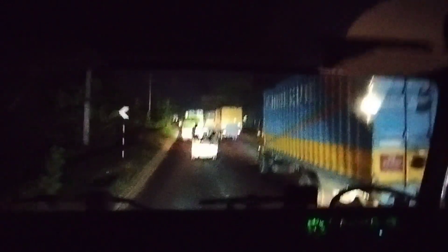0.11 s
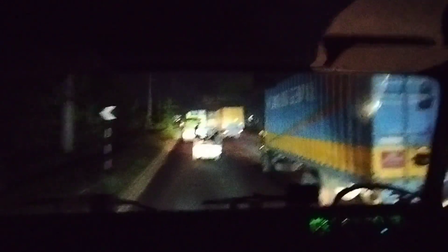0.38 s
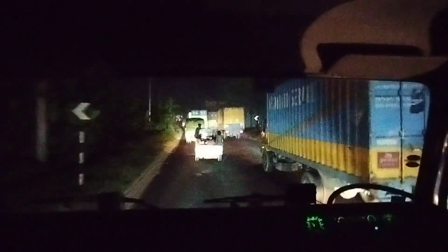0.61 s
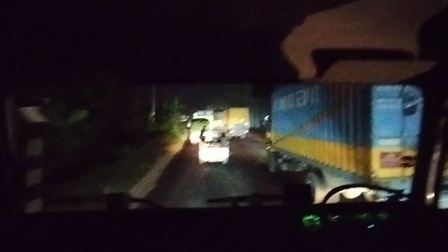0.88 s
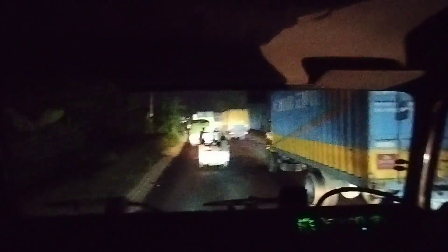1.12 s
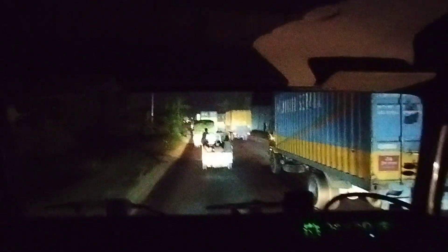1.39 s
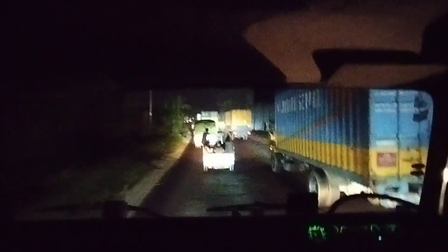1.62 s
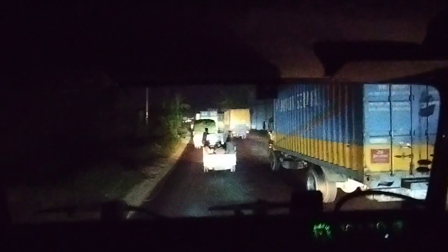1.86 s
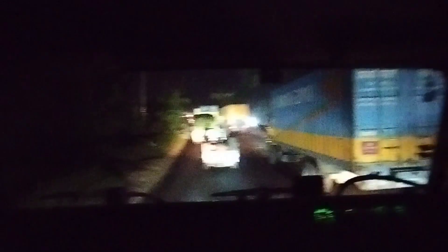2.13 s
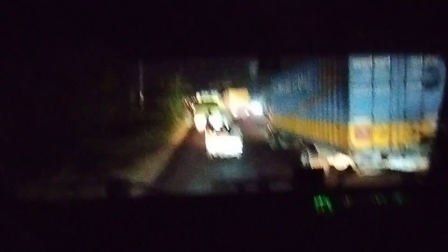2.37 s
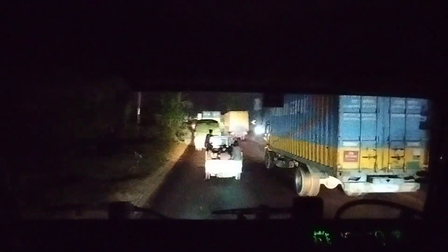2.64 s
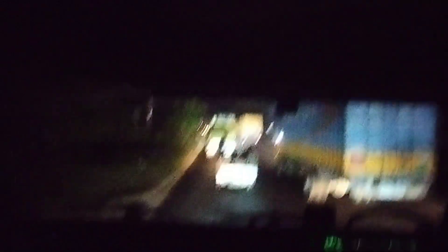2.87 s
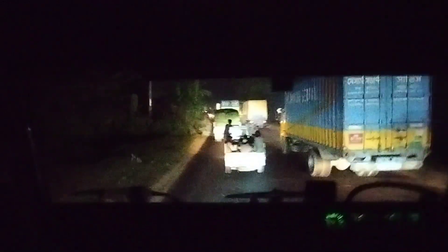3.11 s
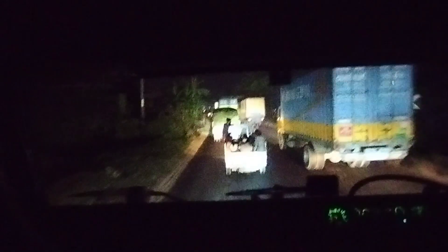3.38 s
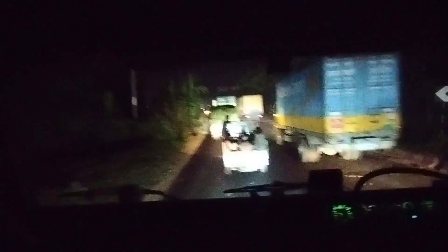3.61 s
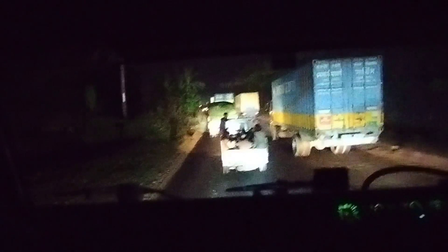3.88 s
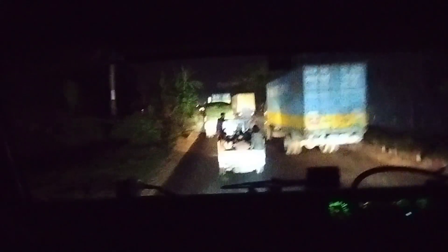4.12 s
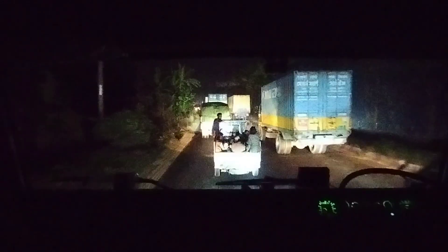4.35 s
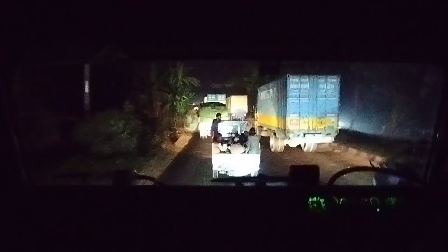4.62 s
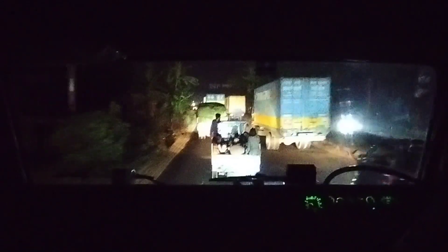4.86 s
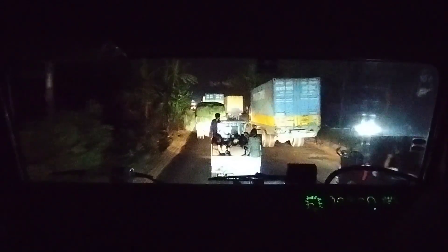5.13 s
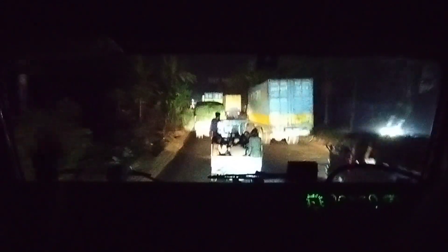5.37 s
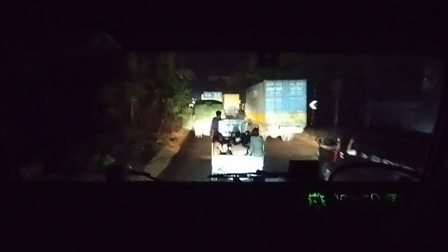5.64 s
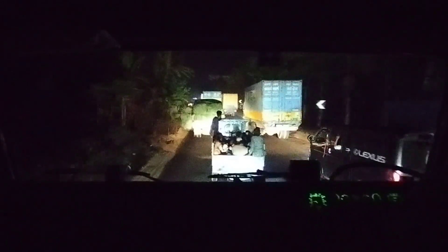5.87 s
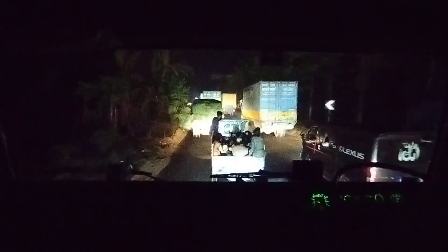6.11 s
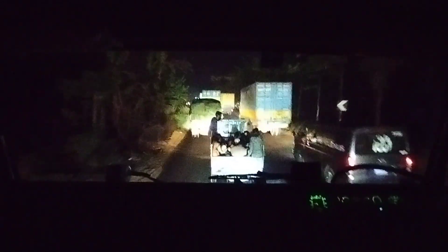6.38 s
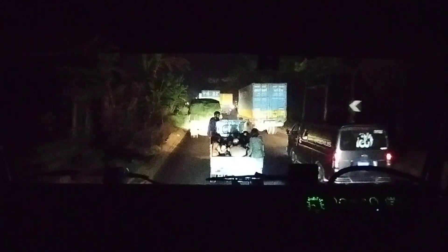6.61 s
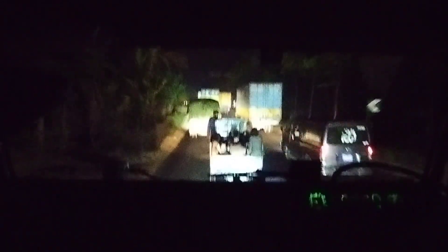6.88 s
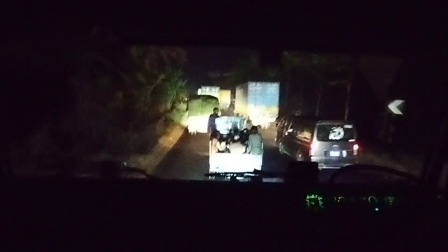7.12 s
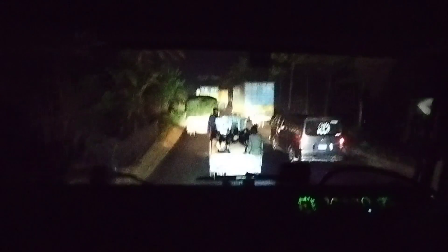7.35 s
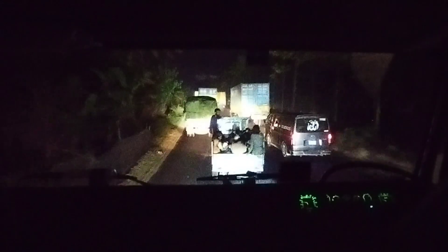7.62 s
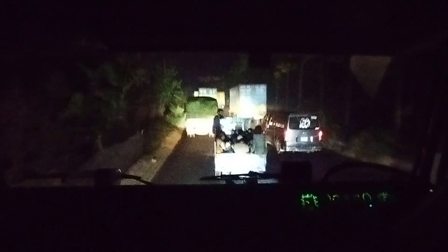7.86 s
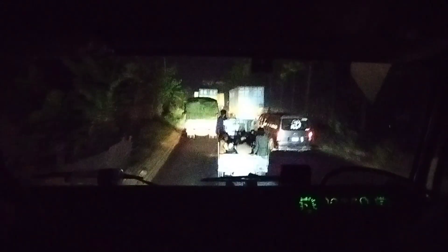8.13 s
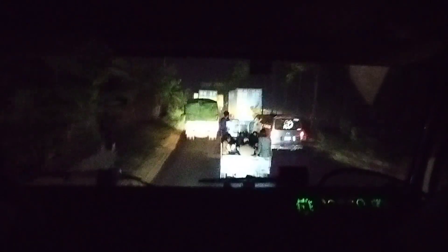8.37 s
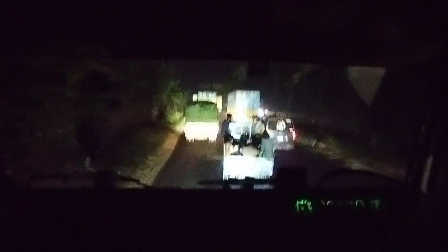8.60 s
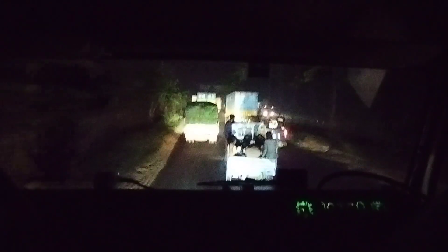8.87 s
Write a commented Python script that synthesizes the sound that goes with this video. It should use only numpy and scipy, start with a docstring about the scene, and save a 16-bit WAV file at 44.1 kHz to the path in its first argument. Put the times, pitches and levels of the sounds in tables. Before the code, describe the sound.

For nine seconds we sit inside a heavy diesel lorry on a rough road, with a close microphone slightly overwhelmed by bass. From 0 to 2 s a deep, irregular body-shake boom heaves over muffled tyre roar, humming panels and fine rattles; keys clink around 1.1 s and trim scratches at jolts. At 2.1-2.5 s the floor panel knocks, then tiny squeaks and metallic tinkles cluster until 3.5 s. The engine note sinks gradually from 2 s, becoming a clearer low throb from about 3.5 s. A tiny dry tick comes at 4.3 s. Engine pitch bottoms near 6 s; at 6.2 s a seat spring gives a short, bright singing squeak. Engine speed climbs back by 7.7 s, with steadier booming, engine clatter, soft rubs and faint fitting buzzes until the end. Heavy surges briefly duck everything.

```python
"""A deep boom fills the cab of a heavy diesel lorry on a rough road, over a roar through the floor.
The boom is the firing tone mixed with body-shake noise; the roar, its hums and clatter are filtered noise.
Loose keys and floor panels ring as struck modes; trim rubs as bursts of grains and squeaks by stick-slip.
A dry tick, a singing seat spring and a buzzing fitting follow; a gain control ducks under loud surges."""
import sys
import numpy as np
from scipy import signal
from scipy.fft import rfft, irfft, next_fast_len
from scipy.io import wavfile
from scipy.ndimage import uniform_filter1d, minimum_filter1d

SR = 44100
rng = np.random.default_rng(int(sys.argv[2]) if len(sys.argv) > 2 else 0)


def elevation(decibels):
    """Turn decibel levels (scalar or array-like) into linear amplitude ratios."""
    levels = np.asarray(decibels, float)
    return 10 ** (levels / 20)


def bounce(signal):
    """Save signal as a 16-bit WAV file at the path given by the first command-line argument."""
    frames = np.transpose(np.atleast_2d(signal))
    limited = np.clip(frames, -1, 1)
    pcm = np.round(limited * 32767).astype(np.int16)
    wavfile.write(sys.argv[1], SR, pcm)


N = 396459

# engine: t/s, firing f/Hz, level of twice the firing rate/dB (before a 2 dB cut)
ENGINE_CURVE = [(0, 49.3, -27), (.45, 48.77, -18.5), (1.2, 47.8, -19.5), (1.45, 46.42, -17),
                (1.65, 46.43, -19), (1.85, 45.23, -48), (2.8, 40.97, -40), (3.4, 39, -42),
                (3.8, 36.66, -41), (4.2, 31.94, -47), (4.85, 29.8, -19), (5.0, 27.4, -15.5),
                (5.2, 30.52, -9.5), (5.3, 27.65, -19), (5.5, 26.2, -17), (5.8, 23.45, -9.5),
                (6.1, 22.71, -12.5), (6.4, 24.06, -10), (6.62, 28.87, -17), (6.88, 32.35, -24),
                (7.1, 31.44, -33), (7.3, 34.1, -39), (7.36, 41.54, -27.5), (7.65, 43.57, -28),
                (7.8, 41.1, -31), (8.04, 42.05, -25), (8.2, 43.07, -30), (8.6, 44.05, -24.5),
                (8.99, 44.9, -26.5)]
# boom before surges and lulls: t/s, level/dB, share of power in the firing tone (0-1; the rest is body shake)
BOOM_CURVE = [(0, -9, 0.024), (1.5, -6, 0.033), (2.8, -8.5, 0.12), (3.2, -11, 0.19), (3.5, -7.5, 0.51),
              (4.0, -7.5, 0.64), (4.9, -6, 1), (5.05, -12, 0.12), (5.2, -9.5, 0.11), (5.35, -4.5, 0.93),
              (6.1, -11, 0.72), (6.5, -7, 0.85), (7.3, -5.5, 0.74), (7.5, -4, 0.89), (8.99, -5.5, 0.93)]
# body-shake spectrum: f/Hz, level per Hz/dB
SHAKE_SPECTRUM = [(7, -2), (13, 3.5), (19, 1), (26, 2.5), (32, -2.5), (39, 2.5), (47, -5), (56, -11.5),
                  (66, -21.5), (80, -36.5)]
# heaves of the body, at which the boom surges: crest t/s, peak level/dB
BODY_HEAVES = [(0.039, 3.1), (0.2, 1), (0.29, -1), (0.631, 2), (0.86, 4.5), (1.1, 1.5), (1.271, 5),
               (1.41, 0.5), (1.65, 5.5), (1.74, -1), (2.027, 5), (2.26, 1.5), (2.421, 1), (2.559, 6),
               (2.67, 4), (2.801, 4.5), (2.89, 4.5), (2.96, 0), (3.13, -1), (3.24, 0.5), (3.34, -0.5),
               (3.489, -3), (3.7, 1), (3.908, 1.5), (4.03, 1), (4.14, 1.5), (4.28, -10), (4.429, 4),
               (4.531, 7), (4.68, 2), (4.811, 4), (4.99, -1), (5.28, 5), (5.42, 5.5), (5.54, 0.5),
               (5.66, -0.5), (5.849, 5), (5.95, 0), (6.05, 0.5), (6.37, 4.5), (6.48, 6.5), (6.68, 0),
               (6.812, 6), (7.14, 0.5), (7.24, 1), (7.33, 3.5), (7.43, 3.5), (7.56, 3.5), (7.791, 6),
               (8.019, 3), (8.2, 4), (8.34, 0.5), (8.64, 2), (8.78, -1.5), (8.95, -2)]
# brief falls of the boom (a negative depth lifts it): t/s, depth/dB
BOOM_LULLS = [(.1, 2.5), (.33, 4), (.7, 7), (.93, 3.5), (1.24, 5.5), (1.36, 19), (1.56, 17), (1.681, 15),
              (2.041, 11.5), (2.21, -5), (2.569, 8.5), (2.73, 1), (2.85, 5), (3.04, -6), (3.152, -4),
              (3.43, 0), (3.6, 5), (3.75, 4), (3.84, 7), (4.09, 10), (4.21, 11), (4.47, 11), (4.58, 12),
              (4.72, 12), (5.02, 5.5), (5.12, 10), (5.35, 7), (5.47, 10), (5.74, 7), (5.9, 7), (6.0, 6),
              (6.1, -6), (6.26, -4), (7.06, 4.5), (7.31, 8), (7.909, 3), (8.28, 6.5), (8.72, 3.5),
              (8.89, 6)]
# road roar: t/s, tyre level/dB, then floor drumming, clatter and window hiss, each level over tyres/dB
ROAR_CURVE = [(0, -28, 2.3, -12, -22), (.25, -33, 1.2, -8.5, -20), (.6, -28.5, 0.7, -10, -19.5),
              (1.4, -31.5, 0.64, -9, -21.5), (1.85, -32.5, 1.1, -10, -18), (2.05, -36.5, 3.2, -19, -18.5),
              (2.3, -29, 3.7, -9, -21.5), (2.6, -31.5, 3, -11, -20.5), (2.9, -33.5, 3.57, -11, -18.5),
              (3.3, -35.5, 5.16, -10, -18.5), (3.7, -39, 1.2, -9.5, -16.5), (4.15, -39.5, 5.27, -14.5, -15),
              (4.4, -33, 3.4, -9.5, -20.5), (4.9, -33.5, 1.8, -8, -18), (5.15, -31, 2.18, -8.5, -18.5),
              (5.9, -35.5, 2.7, -8, -19.5), (6.3, -32, 3.3, -8, -20.5), (6.9, -36, 3.18, -6, -19),
              (7.3, -35, 2.5, -7, -17.5), (7.7, -32.5, 0.81, -5.5, -16.5), (8.15, -37.5, 0.71, -2, -13.5),
              (8.5, -33, 1.01, -4.5, -14.5), (8.99, -36, 2.16, -3, -14.5)]
# tyre spectrum: f/Hz, level per Hz/dB
TYRE_SPECTRUM = [(230, -8), (300, 3.5), (450, 2), (650, -0.5), (900, -4), (1200, -7), (1600, -13),
                 (2200, -28)]
# floor-drumming spectrum: f/Hz, level per Hz/dB
DRUMMING_SPECTRUM = [(110, -4.5), (135, 2.5), (165, -5.5), (200, -1.5), (270, -7.5), (330, -13)]
# spectrum of valve gear and injectors: f/Hz, level per Hz/dB
CLATTER_SPECTRUM = [(700, -32), (1000, -2), (1300, -5), (1700, -9.5), (2400, -12), (3030, -20),
                    (3400, -22.5), (4500, -33.5)]
# window-hiss spectrum: f/Hz, level per Hz/dB
HISS_SPECTRUM = [(1470, -33), (2500, -3.5), (5020, -10.5), (6870, -11.5), (10500, -20), (14300, -26.5),
                 (15600, -28.5)]
# axle rumble: t/s, level/dB
AXLE_CURVE = [(0, -27.5), (.7, -28), (1.4, -24.5), (2.2, -27.5), (3, -28.5), (4.6, -31), (5.2, -25.5),
              (5.5, -29), (5.8, -21.5), (5.95, -28), (6.3, -23.5), (6.85, -30.5), (7.1, -22), (7.6, -22.5),
              (8.1, -32), (8.5, -28), (8.99, -38)]
# axle spectrum: f/Hz, level per Hz/dB
AXLE_SPECTRUM = [(52, -18), (62, -4.5), (75, -3), (100, -1.5), (118, -10.5)]
# cab panels that sing along: f/Hz, bandwidth/Hz, relative level/dB
HUM_RESONANCES = [(133.2, 3.7, 0), (211, 5, -9.5), (248, 6, -7), (272, 3, -4.5), (335.3, 4.8, -4.5),
                  (411.7, 4.3, -3.5), (540, 7.5, -11), (666.3, 6.3, -11.5)]
# all panel hums together: t/s, level over tyres/dB
HUM_CURVE = [(0, -3.5), (1.7, 0), (2.5, -4.5), (4, -6), (6, -4), (8.99, -12)]
# modes of the keys: f/Hz, level/dB, t60/s
KEY_MODES = [(2450, 0, .07), (3980, 0, .06), (4170, -3, .06), (6210, -3, .05), (6490, -4, .05),
             (8100, 0, .05), (9090, -8, .05), (10750, -8, .05), (11450, -8, .05), (9800, -8, .05),
             (12600, -10, .05), (13700, -10, .05), (14900, -10, .05)]
# strikes on the keys: t/s, level/dB, favoured f/Hz
KEY_STRIKES = [(.0864, -32, 6900), (.3316, -45, 8000), (1.113, -35, 3900), (1.114, -39, 8100),
               (1.126, -30, 2450), (1.128, -43, 6400), (1.13, -30, 8100), (1.115, -45, 13700),
               (1.131, -45, 14900), (1.135, -42, 9800), (1.17, -46, 11450), (1.235, -46, 12600),
               (1.134, -48, 12600), (1.168, -33, 8100), (1.169, -34, 6400), (1.172, -41, 4200),
               (1.182, -42, 4200), (1.165, -42, 2450), (1.241, -39, 2450), (1.2396, -43, 8100),
               (2.4545, -38, 3950), (2.455, -43, 8100), (2.457, -39, 11000), (2.5937, -50, 8100),
               (3.045, -46, 6210), (3.06, -43, 6210), (5.5723, -43, 8100), (8.575, -46, 11450),
               (8.595, -45, 8160)]
# trim rubbing at jolts: t/s, level/dB, length/s, tilt/dB (twice this is the gain well above 6 kHz)
TRIM_RUBS = [(0.35, -48.5, 0.028, 7), (0.465, -40, 0.042, 9), (0.812, -29, 0.05, 0.5),
             (0.985, -31.5, 0.05, -15), (1.107, -46, 0.026, 12), (1.167, -37, 0.045, 2.5),
             (1.225, -40, 0.017, 6.5), (1.447, -44.5, 0.022, 7), (1.493, -38.5, 0.066, 6.5),
             (1.603, -27, 0.037, 1.5), (1.697, -56, 0.042, 14), (1.898, -36.5, 0.026, 5.5),
             (2.14, -31.5, 0.034, -1), (2.238, -48, 0.034, 9.5), (2.74, -36, 0.029, 4.5),
             (3.03, -28.5, 0.032, -5), (3.31, -38.5, 0.017, 5.5), (3.41, -45.5, 0.059, 7),
             (3.444, -32.5, 0.048, -1), (3.613, -47, 0.028, 9), (3.64, -41, 0.043, -1),
             (3.7, -39.5, 0.034, 2.5), (3.754, -40.5, 0.035, 5), (3.87, -30.5, 0.032, 2.5),
             (4.123, -32.5, 0.048, -9.5), (4.448, -42.5, 0.033, 7), (4.755, -36.5, 0.074, -16),
             (4.922, -48.5, 0.021, 10.5), (4.959, -34, 0.046, 4.5), (5.054, -45.5, 0.045, 10),
             (5.241, -34, 0.048, 7), (5.417, -31, 0.021, 4), (5.542, -40, 0.036, -10),
             (5.629, -38, 0.034, 5.5), (5.756, -35, 0.082, -14), (5.863, -52, 0.034, 12),
             (6.141, -29.5, 0.057, 1.5), (6.306, -41.5, 0.037, 10), (6.741, -35.5, 0.052, 7.5),
             (6.886, -53, 0.061, 11.5), (6.98, -42.5, 0.15, -8), (7.083, -34, 0.06, 4.5),
             (7.164, -33.5, 0.094, -4.5), (7.429, -53, 0.054, 11.5), (7.643, -40.5, 0.056, 3),
             (8.11, -33.5, 0.12, -7), (8.33, -36.5, 0.077, -16), (8.566, -38, 0.08, -12),
             (2.11, -37, 0.03, -11), (2.91, -31, 0.077, -8), (4.254, -45, 0.032, -9),
             (6.676, -38, 0.034, -9)]
# rubbing spectrum: f/Hz, level per Hz/dB
RUB_SPECTRUM = [(1060, -36.5), (1800, -21), (2540, 4.5), (3010, -5.5), (4060, -2), (4610, -3), (5880, -6),
                (7170, -5.5), (15600, -28)]
# modes of the floor panel: f/Hz, level/dB (before a 3.5 dB cut), t60/s
PANEL_MODES = [(142, -16, 0.12), (214, 3, 0.11), (278, 0.5, 0.17), (335, -2, 0.083), (430, 2, 0.11),
               (662, 3, 0.097), (775, 1, 0.089), (915, 2, 0.077)]
# bumps under the floor panel: t/s, level/dB (before the same cut), favoured f/Hz
PANEL_BUMPS = [(2.144, -8, 214), (2.098, -24, 704), (4.99, -20, 335), (5.13, -29, 662), (5.2, -25, 214),
               (2.146, -26, 775), (2.16, -24, 662), (2.17, -15, 390), (2.272, -23, 915),
               (2.325, -25, 720.5), (2.35, -22, 915), (2.356, -11.5, 278), (2.385, -26, 775),
               (2.39, -13.5, 214), (2.398, -23, 915), (2.448, -16, 335), (3.658, -17.5, 273),
               (3.874, -9, 167), (3.878, -26, 430), (3.881, -25.5, 700), (4.125, -24, 379.7),
               (4.288, -20, 335), (4.78, -21, 320), (5.04, -15, 223), (6.18, -34, 248)]
# stick-slip squeaks: t/s, nominal length/s, slip f/Hz, glide per nominal length/Hz, level/dB, fall per overtone/dB
STICK_SLIPS = [(2.615, .04, 3080, -60, -46, -20), (2.665, .02, 2980, -80, -47, -20),
               (2.742, .03, 3050, 0, -48, -20), (2.81, .045, 3300, -80, -50, -20),
               (2.85, .025, 2150, 0, -42, -20), (2.915, .028, 3230, 0, -47, -20),
               (3.112, .02, 2550, 0, -47, -20), (3.19, .06, 3420, 0, -54, -20),
               (7.185, .03, 810, 0, -44, -2), (3.02, .03, 1600, 0, -39, -24),
               (3.488, .036, 3140, 0, -33, -30), (3.51, .025, 2450, 0, -47, -25),
               (3.5, .02, 2180, 0, -45, -25), (2.44, .03, 2450, -80, -47, -25),
               (2.505, .02, 3100, 0, -52, -25), (2.78, .015, 2400, 0, -46, -25),
               (3.045, .02, 2300, 0, -46, -25), (3.15, .03, 3980, 0, -56, -25),
               (3.505, .025, 3650, 0, -52, -25), (3.545, .025, 3150, 0, -46, -25),
               (4.11, .025, 2580, 0, -45, -25), (3.92, .13, 2830, 0, -54, -25),
               (5.08, .025, 4350, 0, -47, -25), (5.25, .04, 4500, -150, -47, -25),
               (5.04, .06, 2550, 100, -46, -25), (3.88, .13, 2540, 0, -54, -25),
               (4.15, .04, 1540, 0, -44, -30), (4.242, .043, 1580, -100, -33, -30),
               (5.76, .05, 1150, 0, -32, -18), (6.742, .052, 972, 0, -41.5, -1.6)]
# modes of the key tag: f/Hz, level/dB, t60/s
TAG_MODES = [(3130, 0, .2), (4630, -2, .1), (5950, -2, .1), (6650, 0, .09), (6860, 0, .11), (7060, 0, .1),
             (7160, 0, .12)]
# strikes on the key tag: t/s, level/dB, favoured f/Hz
TAG_STRIKES = [(2.51, -44, 6860), (2.528, -46, 6860), (2.53, -54, 4630), (2.59, -52, 5950),
               (2.635, -53, 5950), (2.455, -46, 5950), (2.745, -45, 6650), (2.748, -45, 7060),
               (2.76, -43, 7060), (2.785, -45, 5950), (2.819, -48, 6846), (2.93, -49, 5950),
               (2.96, -50, 5950), (3.02, -45, 5950), (3.08, -49, 5964), (3.161, -50, 7020),
               (3.205, -48, 6650), (3.235, -46, 6650), (3.255, -49, 6650), (3.218, -48, 7160),
               (3.235, -48, 7060), (2.765, -49, 6650), (3.455, -46, 4630), (3.252, -54, 7120),
               (3.511, -49, 7150), (3.45, -46, 4630), (3.531, -44, 3130), (7.092, -41, 4630)]
# dry tick in the dash: t/s, impulse level before filtering/dB
DASH_TICKS = [(4.2906, -10)]
# squeak of the seat spring: t/s, f/Hz, level/dB
SEAT_CURVE = [(6.11, 1232, -44), (6.146, 1222, -34), (6.156, 1226, -23), (6.168, 1236, -11.5),
              (6.183, 1236, -14), (6.194, 1238, -20), (6.203, 1243, -12.5), (6.211, 1246, -18),
              (6.22, 1238, -12), (6.24, 1234, -15.5), (6.262, 1234, -24), (6.3, 1232, -42)]
# resonances of a loose fitting: f/Hz, bandwidth before widening/Hz, relative level/dB
FITTING_RESONANCES = [(3340, 29, 9), (4310, 34, 4.5), (4760, 33, -11), (6040, 60, -1), (6900, 56, 5.5),
                      (7270, 50, -6), (7430, 40, -4), (7800, 90, -10), (7930, 88, -5), (9400, 310, -13),
                      (9800, 170, -10), (9800, 80, -22)]
# buzzes of that fitting: t/s, length before the tail/s, level/dB
FITTING_BUZZES = [(6.871, 0.14, -48), (7.099, 0.052, -51), (7.172, 0.038, -43.5), (7.48, 0.072, -52.5),
                  (8.107, 0.24, -52), (8.358, 0.13, -49), (8.588, 0.17, -52)]


def rms_one(x):
    """Normalisation: scale to unit rms."""
    return x / np.sqrt(np.mean(x ** 2) + 1e-20)


def in_time(rows):
    """Linear interpolation: table columns become curves with one value per sample."""
    s, *columns = np.transpose(rows)
    return [np.interp(np.arange(N) / SR, s, c) for c in columns]


def drift(rate_hz):
    """Low-pass random process: noise through a double pole at rate_hz, scaled to unit spread."""
    r = np.exp(-80 * np.pi * rate_hz / SR)   # computed once every 40 samples
    noise = rng.standard_normal(N // 40 + 2002)
    slow = signal.lfilter([1], [1, -2 * r, r * r], noise)[2000:]
    return np.interp(np.arange(N) / 40, np.arange(len(slow)), rms_one(slow - slow.mean()))


def coloured(spectrum, x):
    """Spectral shaping: weight each frequency, with steep skirts beyond the ends; unit rms."""
    hz, db = np.transpose(spectrum)
    size = next_fast_len(N)
    octave = np.log2(np.arange(size // 2 + 1) * SR / size + 1)
    ends = np.log2(hz)
    outside = np.maximum(ends[0] - octave, 0) + np.maximum(octave - ends[-1], 0)
    gain_db = np.interp(octave, ends, db) - 30 * outside   # dB per octave
    return rms_one(irfft(rfft(x, size) * elevation(gain_db), size)[:N])


def grainy(spread_db):
    """Amplitude modulation: white noise with a randomly fluttering level."""
    return rng.standard_normal(N) * elevation(spread_db * (drift(38) + drift(49)))


def resonance(x, hz, width_hz):
    """Steady resonance: a pole pair passes a narrow band of the driving noise."""
    r = np.exp(-np.pi * width_hz / SR)
    return signal.lfilter([1 - r, 0, r - 1], [1, -2 * r * np.cos(2 * np.pi * hz / SR), r * r], x)


def ringing(x, hz, t60):
    """Free vibration: each impulse starts a sine that decays by 60 dB in t60 seconds."""
    r, w = elevation(-60 / (t60 * SR)), 2 * np.pi * hz / SR
    return signal.lfilter([0, np.sin(w)], [1, -2 * r * np.cos(w), r * r], x)


def struck(modes, hits, spread_db, contact_s, focus_db):
    """Modal excitation: a soft contact drives most the modes near its favoured pitch."""
    s, hit_db, favoured_hz = np.transpose(hits)
    at = (s * SR).astype(int)
    chance = rng.standard_normal((len(hits), len(modes)))
    t = np.arange(int(contact_s * SR) + 2)
    swell = np.hanning(len(t))
    out = np.zeros(N)
    for k, (hz, db, t60) in enumerate(modes):
        detuning_db = focus_db * np.abs(np.log2(favoured_hz / hz))   # focus in dB per octave
        clicks = np.full(N, 1e-18)
        clicks[at] = elevation(hit_db + db + spread_db * chance[:, k] - detuning_db)
        contact = 2 * swell * np.cos(2 * np.pi * hz / SR * t) / swell.sum()
        out += ringing(signal.oaconvolve(clicks, contact)[:N], hz, t60)
    return out


def burst(length, rise, tail):
    """Envelope of forced then free motion: quick rise, plateau, exponential tail."""
    t = np.arange(int((length + 6 * tail) * SR)) / SR
    return np.minimum(t / rise, 1) * np.exp(-np.maximum(t - length, 0) / tail)


def surges():
    """Transient displacement: cosine-squared boom peaks, slower to settle after a harder heave."""
    rise_s, fall_s, longer_per_db = 0.063, 0.05, 0.31
    t, out = np.arange(N) / SR, np.zeros(N)
    for s, db in BODY_HEAVES:
        part = slice(max(round((s - .2) * SR), 0), round((s + .4) * SR))
        width = np.where(t[part] < s, rise_s, fall_s * (1 + longer_per_db * max(db, 0)))
        arch = np.cos(np.pi / 2 * np.clip((t[part] - s) / width, -1, 1)) ** 2
        out[part] = np.maximum(out[part], elevation(db) * arch)
    return out


def engine():
    """Superposition: a periodic firing tone beats against body-shake noise, with its octave above."""
    evenness = 0.82   # share of the beating that is evened out
    lull_s = 0.022    # half width at 1/e of the depth
    hz, octave_db = in_time(ENGINE_CURVE)
    boom_db, share = in_time(BOOM_CURVE)
    share = np.clip(share, 0, 1)
    phase = 2 * np.pi * np.cumsum(hz * (1 + .007 * drift(6))) / SR
    firing = np.sqrt(2 * share) * elevation(1.3 * drift(8.0)) * np.sin(phase)
    shake = np.sqrt(1 - share) * coloured(SHAKE_SPECTRUM, rng.standard_normal(N))
    mix = firing + shake
    power = uniform_filter1d(uniform_filter1d(mix ** 2, size=2200), size=2200)
    beating = np.sqrt(power + 0.013)
    swell = np.maximum(elevation(boom_db) * beating ** (1 - evenness), surges() / np.sqrt(2))
    t = np.arange(N) / SR
    lull_db = sum(db * np.exp(-((t - s) / lull_s) ** 2) for s, db in BOOM_LULLS)
    swell = uniform_filter1d(swell, size=1000) * elevation(-lull_db)
    octave = elevation(octave_db - 2 + 1.7 * drift(4)) * np.sin(2 * phase + 1)
    return swell * mix / beating + octave


def roar_level():
    """Level modulation: the slow tyre curve in dB, lifted at each jolt by how hard the trim rubs."""
    jolt_lift_db, full_jolt_db = 3.5, -32.5   # a rub at full_jolt_db lifts the roar by jolt_lift_db
    lift = np.zeros(N + SR)
    for s, db, length, _ in TRIM_RUBS:
        shape = burst(length, rise=0.016, tail=0.019)
        lift[round(s * SR):][:len(shape)] += jolt_lift_db * elevation(db - full_jolt_db) * shape
    return in_time(ROAR_CURVE)[0] + lift[:N]


def road():
    """Incoherent addition: axle rumble, tyres, floor drumming, engine clatter and window hiss as noise."""
    roar_db = roar_level()
    _, drum_db, clatter_db, hiss_db = in_time(ROAR_CURVE)
    axle_db = in_time(AXLE_CURVE)[0]
    axle = elevation(axle_db + 1.0 * drift(17.0)) * coloured(AXLE_SPECTRUM, rng.standard_normal(N))
    tyres = elevation(roar_db + 1.5 * drift(25)) * coloured(TYRE_SPECTRUM, grainy(0.57))
    drumming = elevation(roar_db + drum_db + 1.77 * drift(8.0)) * coloured(DRUMMING_SPECTRUM, grainy(0.2))
    clatter = elevation(roar_db + clatter_db + 2.1 * drift(6.1)) * coloured(CLATTER_SPECTRUM, grainy(0.39))
    hiss = elevation(roar_db + hiss_db + 1.13 * drift(4.9)) * coloured(HISS_SPECTRUM, grainy(1.0))
    return axle + tyres + drumming + clatter + hiss


def hums():
    """Forced resonance: road noise drives the cab panels, each singing narrowly and swelling on its own."""
    out, noise = np.zeros(N), rng.standard_normal(N)
    for hz, width_hz, db in HUM_RESONANCES:
        out += elevation(db + 2.9 * drift(4.0)) * rms_one(resonance(noise, hz, width_hz))
    return elevation(roar_level() + in_time(HUM_CURVE)[0]) * rms_one(out)


def rattles(level_db, per_s):
    """Random impulses: small loose parts tick, each decaying by 60 dB in 90 cycles."""
    sizes = elevation(4.1 * np.minimum(rng.exponential(1, N), 3)) * (rng.random(N) < per_s / SR)
    pitches = np.geomspace(500, 10000, 28)
    dealt = rng.integers(0, 28, N)   # which part ticks
    out = np.zeros(N)
    for k, hz in enumerate(pitches):
        ticks = sizes * (dealt == k) + 1e-18
        out += elevation(-6 * np.log2(hz / 1000)) * ringing(ticks, hz, t60=90 / hz)
    return elevation(roar_level() + level_db) * rms_one(out)


def keys():
    """Impact of small metal bodies: short contacts ring the bright modes of the keys."""
    return struck(KEY_MODES, KEY_STRIKES, spread_db=1.5, contact_s=.007, focus_db=60)


def rubs():
    """Dry friction: dense random slips of trim on trim make scratchy bursts, each with its own tilt."""
    crest_db = 15   # taken off each level, as the grains peak far above their rms
    slips_per_s = 6000
    sizes = elevation(3.1 * np.minimum(rng.exponential(1, N), 4)) * rng.choice([-1, 1], N)
    scratch = coloured(RUB_SPECTRUM, sizes * (rng.random(N) < slips_per_s / SR))
    upper = signal.lfilter(*signal.butter(1, 6000, "high", fs=SR), scratch)
    out = np.zeros(N)
    for s, db, length, tilt_db in TRIM_RUBS:
        i = round(s * SR)
        shape = burst(length, rise=0.015, tail=0.016)[:N - i]
        part = slice(i, i + len(shape))
        tilted = scratch[part] + (elevation(2 * tilt_db) - 1) * upper[part]
        out[part] += elevation(db - crest_db) * shape * tilted
    return out


def bumps():
    """Plate vibration: soft blows ring the low modes of the floor panel."""
    blows = struck(PANEL_MODES, PANEL_BUMPS, spread_db=1.0, contact_s=0.0092, focus_db=47)
    return elevation(-3.5) * blows


def squeaks():
    """Stick-slip: regular slipping gives a harmonic stack; unevenness makes it throb and waver."""
    unevenness = .45
    out, throb, waver = np.zeros(N), drift(64), drift(140)
    for s, length, slip_hz, glide_hz, db, fall_db in STICK_SLIPS:
        done = np.arange(int(1.3 * length * SR)) / (length * SR)   # runs to 1.3 nominal lengths
        i = round(s * SR)
        part = slice(i, i + len(done))
        shape = np.hanning(len(done)) ** .55
        hz = (slip_hz + glide_hz * done) * (1 + .025 * unevenness * waver[part])
        phase = 2 * np.pi * np.cumsum(hz) / SR
        overtones = range(int(14000 / slip_hz))
        stack = sum(elevation(fall_db * k) * np.sin((k + 1) * phase + k * k) for k in overtones)
        out[part] += elevation(db + 5 * unevenness * throb[part]) * shape * stack
    return out


def tag():
    """Modal selectivity: each strike on the key tag rings little but the modes at its favoured pitch."""
    return struck(TAG_MODES, TAG_STRIKES, spread_db=1.5, contact_s=.009, focus_db=300)


def snap():
    """Impulse response: one click through a band-pass gives a short bright tick."""
    out = np.zeros(N)
    for s, db in DASH_TICKS:
        out[round(s * SR)] = elevation(db)
    return signal.sosfilt(signal.butter(2, [3000, 9000], "band", fs=SR, output="sos"), out)


def seat():
    """Beating of close modes: the spring's note has near neighbours, and overtones while pressed hard."""
    hz, db = in_time(SEAT_CURVE)
    times = np.transpose(SEAT_CURVE)[0]
    t = np.arange(N) / SR
    level = elevation(db + 0.9 * drift(60)) * (t > times[0]) * (t < times[-1])
    phase = 2 * np.pi * np.cumsum(hz * (1 + 0.003 * drift(90))) / SR
    early = np.exp(-np.maximum(t - times[3], 0) / 0.05)   # the neighbours die away
    note = np.sin(phase) + early * (0.35 * np.sin(.94 * phase) + 0.15 * np.sin(1.05 * phase))
    press, release = np.clip((t - times[2]) / .01, 0, 1), np.clip((times[-3] - t) / .025, 0, 1)
    pressed = elevation(-14) * press * release * elevation(3 * drift(60))
    wander_hz = 14 * drift(160) + 150 * (t - times[5])
    loose = phase + 2 * np.pi * np.cumsum(wander_hz) / SR
    overtones = elevation(-21) * np.sin(1.98 * loose)
    overtones += elevation(-30) * early ** .5 * np.sin(2.93 * loose)
    overtones += elevation(-22) * early ** 2 * np.sin(1.71 * loose)
    return level * note + pressed * overtones


def buzz():
    """Driven resonance: hard shaking makes a loose fitting sizzle through its broadened modes."""
    shake_widens = 5.5   # factor on each bandwidth
    gate, noise, out = np.zeros(N), grainy(0.72), np.zeros(N)
    for s, length, db in FITTING_BUZZES:
        i = round(s * SR)
        shape = burst(length, rise=0.0077, tail=0.029)[:N - i]
        gate[i:i + len(shape)] += elevation(db) * shape
    for hz, width_hz, db in FITTING_RESONANCES:
        out += elevation(db) * resonance(noise, hz, width_hz * shake_widens)
    out = signal.sosfilt(signal.butter(6, 11000, fs=SR, output="sos"), out)
    return gate * rms_one(out)


def scene():
    """Linear superposition: all sources add at one microphone."""
    steady = engine() + road() + hums() + rattles(level_db=-9.5, per_s=330)
    passing = keys() + rubs() + bumps() + squeaks() + tag() + snap() + seat() + buzz()
    return (steady + passing)[None]


def top_cut(x):
    """Nothing passes above the cut-off."""
    return signal.sosfilt(signal.butter(12, 15740, fs=SR, output="sos"), x)


def record(dry):
    """Gain control: ducks at once under loud surges and creeps back; a fast limiter takes the rest."""
    hold_db, recover_s, ceiling = -1, 0.13, 1
    t = np.arange(N) / (SR * recover_s)
    over_db = np.maximum(20 * np.log10(np.abs(dry) + 1e-9) - hold_db, 1e-3)
    # running peak whose dB of reduction decay exponentially
    duck_db = np.exp(np.maximum.accumulate(np.log(over_db) + t, axis=1) - t)
    ahead_db = np.roll(uniform_filter1d(duck_db, size=660, axis=1), -330, axis=1)
    held = dry * elevation(-ahead_db)
    gain = minimum_filter1d(1 / np.maximum(np.abs(held) / ceiling, 1), size=441, axis=1)
    gain = uniform_filter1d(gain, size=441, axis=1)
    return top_cut(held * gain)


dry = scene()
out = record(dry)
bounce(out)
```